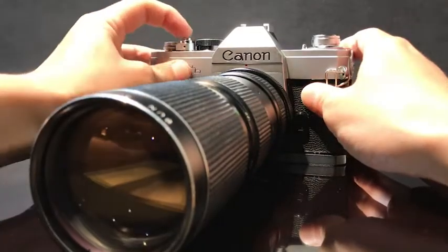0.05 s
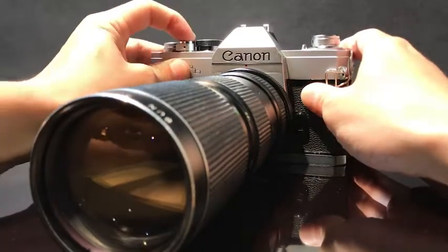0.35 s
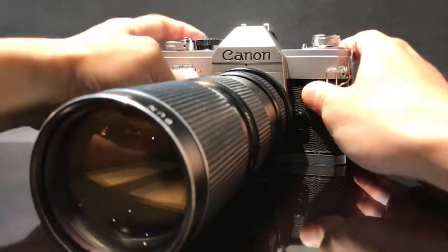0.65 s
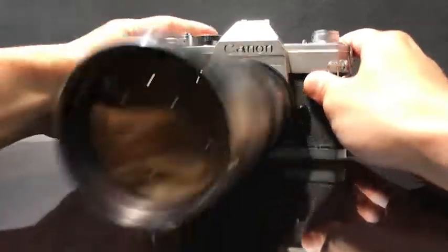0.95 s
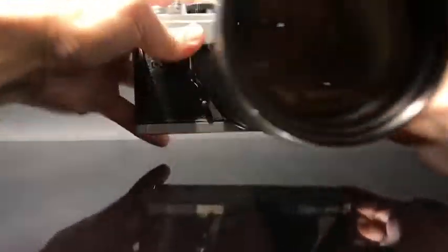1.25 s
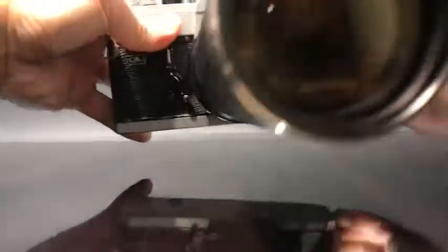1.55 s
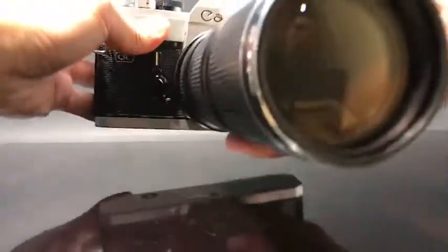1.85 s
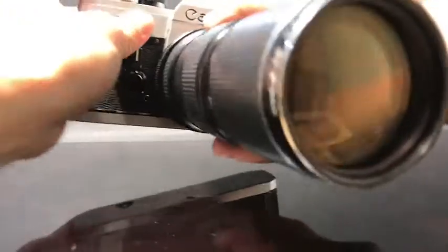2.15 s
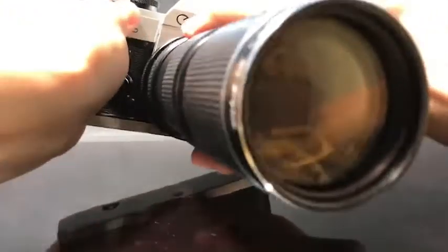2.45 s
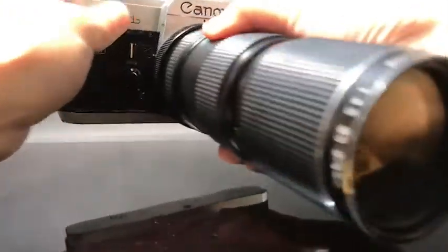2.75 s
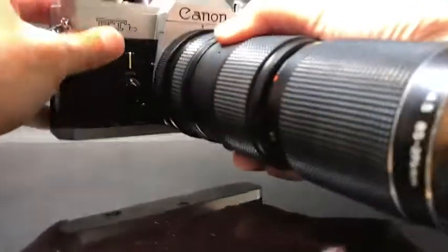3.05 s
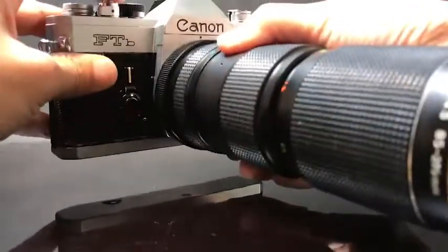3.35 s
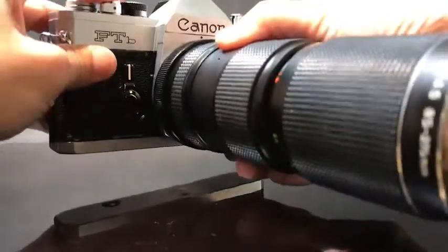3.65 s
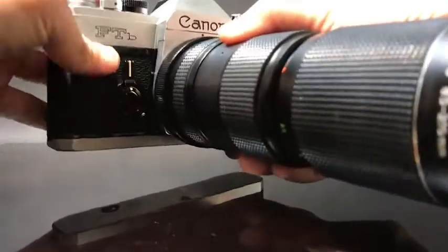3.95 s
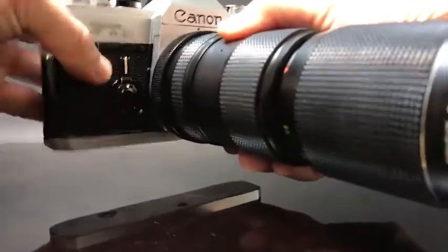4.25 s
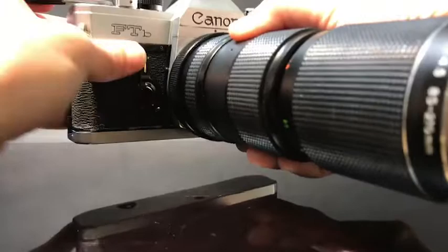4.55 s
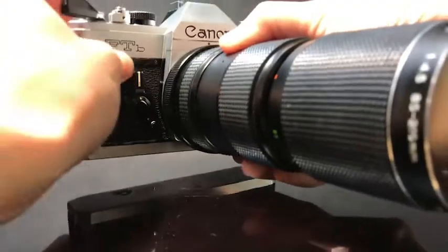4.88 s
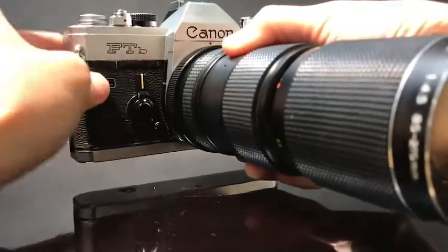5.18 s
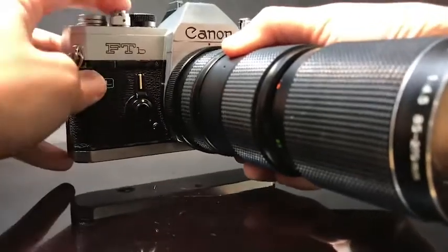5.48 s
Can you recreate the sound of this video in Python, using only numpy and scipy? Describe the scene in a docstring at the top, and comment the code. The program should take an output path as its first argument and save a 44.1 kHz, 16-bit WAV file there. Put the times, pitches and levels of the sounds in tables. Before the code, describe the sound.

Three crisp shutter clacks from a hand-wound film camera, separated by ticking gears, finger rubs and sharp lever snaps in a quiet room.

```python
"""A small quiet room, close on a mechanical film camera that is fired three times.
Each release plays the same cycle: the mirror flips up, the cloth curtains run and slam home, the mirror
drops. The first shot is on the desk, the others in the hands. Between shots the thumb winds on: skin
rubs, gears whirr, pawls tick, and the advance lever snaps back against its stop.
Hits are noise bursts plus ringing modes; rubs and whirrs are noise broken into tiny slips."""
import sys
import numpy as np
from scipy import signal
from scipy.fft import rfft, irfft, next_fast_len
from scipy.io import wavfile

SR = 44100
rng = np.random.default_rng(int(sys.argv[2]) if len(sys.argv) > 2 else 0)


def wav_record(signal):
    """Record a signal, one row per channel, as 16-bit PCM in the file named by sys.argv[1]."""
    frames = np.transpose(np.atleast_2d(signal))
    bounded = np.clip(frames, -1, 1)
    # unit amplitude maps onto the largest positive 16-bit level
    quanta = np.round(bounded * 32767).astype(np.int16)
    wavfile.write(sys.argv[1], SR, quanta)


N = 252252
TIME = np.arange(N) / SR
AGE = np.arange(SR // 8) / SR  # seconds since a hit
TOP_HZ = 15750


def amp(db):
    """Decibels to gain."""
    return 10 ** (np.asarray(db) / 20)


def unit(x):
    """Scale to rms 1."""
    return x / np.sqrt(np.mean(x ** 2) + 1e-20)


def along(points, hz):
    """Read a curve of (freq_hz, value) points on a log frequency axis."""
    freqs, values = np.transpose(points)
    return np.interp(np.log(hz + 1), np.log(freqs), values)


def fade(t, t60):
    """Exponential decay, 60 dB down at t60."""
    return np.exp(-np.log(1000) * t / np.maximum(t60, 1e-4))


def add(track, start_s, sound):
    """Mix a sound into a track."""
    part = track[round(start_s * SR):][:len(sound)]
    part += sound[:len(part)]


def coloured(x, eq, tilt_db=0):
    """Minimum-phase EQ of unit power gain, tilted by tilt_db per octave."""
    hz = np.fft.rfftfreq(4096, 1 / SR)
    gain = unit(amp(along(eq, hz) + tilt_db * np.log2(np.clip(hz, 400, TOP_HZ))))
    cepstrum = irfft(np.log(gain + 1e-9))
    cepstrum[1:len(hz) - 1] *= 2
    cepstrum[len(hz):] = 0
    impulse = irfft(np.exp(rfft(cepstrum)))
    return signal.oaconvolve(x, impulse)[:len(x)]


def crack(t60, rise_s):
    """The dense, fast-dying chatter of small metal parts after a contact."""
    return rng.standard_normal(len(AGE)) * fade(AGE, t60) * (1 - np.exp(-AGE / rise_s))


def ping(hz, t60):
    """A single damped mode."""
    return np.sin(2 * np.pi * hz * AGE) * fade(AGE, t60)


def ring(modes, scatter_db, detune):
    """Damped modes; level and pitch vary with each hit, and rattling parts blur their phase."""
    hz, db, t60 = np.transpose(modes)[:, :, None]
    size, shift, phase = rng.standard_normal((3, len(modes), 1))
    width_hz = .03 * hz
    blur = np.cumsum(rng.standard_normal((len(modes), len(AGE))), 1) * np.sqrt(2 * np.pi * width_hz / SR)
    waves = np.sin(2 * np.pi * (hz * (1 + detune * shift) * AGE + phase) + blur)
    attack = 1 - np.exp(-AGE / .00044)
    return np.sum(amp(db + scatter_db * size) * fade(AGE, t60) * waves, 0) * attack


def friction(eq, slips_per_s, spread_db):
    """A grainy bed of tiny uneven slips, at rms 1."""
    knots = rng.standard_normal(int(N / SR * slips_per_s) + 2)
    slips = amp(spread_db * np.interp(TIME * slips_per_s, np.arange(len(knots)), np.minimum(knots, 2)))
    return unit(coloured(slips * rng.standard_normal(N), eq))


def run_up(start_s, stop_s, db, growth_db):
    """Envelope of a spring-driven part that gains speed until it is stopped."""
    to_go = np.clip((stop_s - TIME) / (stop_s - start_s), 0, 1)
    return ((TIME > start_s) & (TIME < stop_s)) * amp(db - growth_db * to_go)


def stroke(start_s, length_s, rise_s, db, sag_db=5):
    """Envelope of one hand movement: it builds, eases off and is let go."""
    t = np.maximum(TIME - start_s, 0)
    eased_db = db - sag_db * np.minimum(t / length_s, 1)
    release = fade(np.maximum(t - length_s, 0), t60=.24)
    return np.minimum(t / rise_s, 1) * amp(eased_db) * release


# EQ of the room's air: freq_hz, gain_db
AIR_EQ = [(20, -11), (55, 0.5), (85, -14.5), (120, -10.5), (170, -14), (260, -10), (400, -16.5), (600, -20),
          (1000, -20), (2000, -26.5), (4000, -32), (8000, -40), (11000, -41), (15500, -41.5)]
# appliance hum: pitch_hz, level_db
HUM_TONES = [(54, -69.5), (121, -70)]


def room_tone():
    """A soft steady hiss over a faint appliance hum."""
    hum = sum(amp(db) * unit(np.sin(2 * np.pi * (hz * TIME + rng.random()))) for hz, db in HUM_TONES)
    return amp(-57.5) * unit(coloured(rng.standard_normal(N), AIR_EQ)) + hum


# resonances of the camera body, on the desk and held: pitch_hz, desk_db, held_db, t60_s
BODY_MODES = [(388, -26.5, -42.5, 0.052), (632, -30, -27, 0.16), (696, -27.5, -27.5, .07),
              (854, -28, -26.5, 0.058), (1234, -18, -29, 0.055), (1260, -18, -30, .05),
              (1676, -28, -21, 0.053), (1836, -29.5, -22.5, 0.059), (2015, -26, -21.5, 0.058),
              (2370, -30.5, -20.5, 0.05), (2830, -24, -23, .04), (3060, -19.5, -30.5, 0.034),
              (3490, -25, -27, 0.12), (4100, -26.5, -23, 0.078), (5970, -21.5, -20.5, 0.069),
              (6350, -19.5, -30, 0.032), (7140, -22, -25.5, 0.05), (8640, -19.5, -28.5, 0.062)]
DESK_MODES = [(hz, db, t60) for hz, db, _, t60 in BODY_MODES]
HELD_MODES = [(hz, db, t60) for hz, _, db, t60 in BODY_MODES]
# bright EQ of a small metal contact: freq_hz, gain_db
TICK_EQ = [(150, -20), (450, -15.5), (680, -8.5), (1500, -4.5), (2300, -5.5), (4200, -4), (6300, 3),
           (7800, -3), (9200, 2.5), (11000, -1), (13000, 3.5), (15500, -3.5)]
# tick cues, low end relative to level: start_s, level_db, low_end_db
TICK_CUES = [(0.081, -38, -18), (.0972, -36.5, -27), (0.4928, -33.5, -1.5), (.854, -49.5, 12),
             (1.1144, -42.5, 1), (1.147, -46.5, 9), (1.4384, -42, -16.5), (1.5, -25, -25),
             (1.5499, -29.5, 4), (1.5638, -30, -14), (1.5998, -22, -21.5), (1.9816, -37, 7.5),
             (2.0153, -36.5, -1), (2.0605, -23, -39), (2.0644, -14, -41), (2.0774, -18, -34),
             (2.1392, -19.5, -28), (2.1585, -32, -1), (2.1654, -33.5, -1), (2.24, -35.5, 1),
             (2.2637, -21, -27), (2.4894, -35, -1), (2.5064, -36, -10), (2.831, -28, -18.5),
             (3.751, -32, -8.5), (4.1648, -23.5, -19), (4.2123, -25, -13.5), (4.2399, -25, -1.5),
             (4.261, -31, -21), (4.3124, -26, -22), (4.3216, -34.5, 0), (4.377, -44.5, 9),
             (4.5948, -10.5, -42), (4.6064, -18.5, -38), (4.6633, -23, -16.5), (4.6805, -30, -9),
             (4.6868, -28.5, -10), (4.784, -21.5, -28), (5.0883, -33.5, -6), (5.1044, -35, -3),
             (5.384, -31, -11), (5.6313, -36, -24)]


def ticks():
    """Pawls, gear teeth and strap fittings click; the duller hits stir more of the body."""
    out = np.zeros(N)
    for start_s, db, low_end_db in TICK_CUES:
        dull_db = low_end_db + 17.5
        tilt_db = -.2 * max(dull_db, -7)  # steel on steel gets no brighter than this
        tick = coloured(crack(t60=.017, rise_s=.0005), TICK_EQ, tilt_db)
        body = amp(-2 + .46 * dull_db) * ring(HELD_MODES, scatter_db=3, detune=.05)
        add(out, start_s, amp(db - 4) * (tick + body))
    return out


# EQ of the shutter's clack: freq_hz, desk_db, held_db
CLACK_EQ = [(80, -15, -22.5), (299.4, -16.5, -25.5), (629, -10.5, 4.5), (1250, 0, -4.5), (2010, -3.5, 1),
            (4160, 1, 2), (4700, -6, -3), (6000, 1, 0.5), (8050, -3.5, -4.5), (9900, -2.5, -5),
            (11500, -5.5, -4.5), (13000, -6, -1.5), (15700, -11, -7)]
DESK_EQ = [(hz, db) for hz, db, _ in CLACK_EQ]
HELD_EQ = [(hz, db) for hz, _, db in CLACK_EQ]
# The hits of one shot: the mirror lets go, hits its top stop and bounces twice; two curtains land,
# the second rebounds; the mirror drops and settles in two bounces.
# delay_s, desk_db, held_db, t60_s, tilt_db_per_octave, body_db, spring_db
SHUTTER_HITS = [(0, -10.5, -15, .021, 0.65, 2.5, -13.5), (.0081, -11, -9, .007, -0.5, -0.5, 1),
                (0.0205, -16.5, -17.5, .013, 1.5, -2.5, -1), (.03, -22, -22, .011, -7, 5, -16),
                (.0527, -8, -9, .038, 1, 1.5, -18.5), (.0578, -6.5, -6.5, .019, 1, 2.5, -14.5),
                (0.067, -20, -17, .017, 1, -0.5, -13), (.0912, -24, -18.5, .013, 2, 4, -13.5),
                (0.1235, -32.5, -32, .021, 0, -2, -18), (0.1442, -38.5, -40.5, .017, -8, 8, -15)]
# shutter cues: start_s, tilt_db_per_octave, body_db
SHOT_CUES = [(.1580, -0.24, 0), (3.4850, 0.5, 0.5), (5.6957, 0.5, 2.5)]


def shutter(lift_s=.9):
    """Mirror and curtains strike the body and ping a spring; after lift_s the grip changes the tone."""
    out = np.zeros(N)
    curtains = friction(DESK_EQ, slips_per_s=700, spread_db=5)
    for start_s, shot_tilt_db, shot_body_db in SHOT_CUES:
        held = start_s > lift_s
        eq, modes, curtain_db = (HELD_EQ, HELD_MODES, -29) if held else (DESK_EQ, DESK_MODES, -27.5)
        out += run_up(start_s + .012, start_s + .054, curtain_db, growth_db=4.5) * curtains
        for delay_s, desk_db, held_db, t60, tilt_db, body_db, spring_db in SHUTTER_HITS:
            # a long hit is a pile-up of contacts, so its attack is slower too
            hit = amp(4.5) * coloured(crack(t60, rise_s=.052 * t60), eq, tilt_db + shot_tilt_db)
            hit += amp(body_db + shot_body_db) * ring(modes, scatter_db=1.5, detune=.018)
            hit += amp(spring_db) * ping(hz=9770, t60=.0068)
            add(out, start_s + delay_s, amp(held_db if held else desk_db) * hit)
    return out


# EQs of midrange skin rub and airy gear whirr: freq_hz, gain_db
RUB_EQ = [(150, -12.5), (500, -12), (660, 6.5), (900, -6), (1200, 3), (1500, -9), (2200, -5), (3300, -10),
          (4600, -11), (8000, -14.5), (15000, -32)]
WHIRR_EQ = [(1500, -21), (4000, -6.5), (6000, -2), (9000, -2.5), (11000, -2.5), (13000, 3), (15500, -6.5)]
# finger moves: start_s, length_s, rise_s, rub_db, whirr_db
WINDING_CUES = [(0.545, 0.2, 0.037, -66, -68), (0.979, 0.066, 0.03, -59, -80),
                (1.468, 0.15, 0.032, -52, -65), (1.706, 0.17, 0.027, -51.5, -61),
                (2.068, 0.26, .03, -57.5, -56.5), (2.478, 0.036, .02, -54.5, -74),
                (4.162, 0.12, .05, -48.5, -62), (4.414, .12, 0.0033, -46.5, -55),
                (4.574, 0.24, 0.081, -53, -57), (4.886, 0.037, .012, -74, -58),
                (5.077, 0.085, .02, -51.5, -72)]


def winding():
    """A finger slides over the casing while the film gears turn in tiny catches."""
    sliding = sum(stroke(*timing, db) for *timing, db, _ in WINDING_CUES)
    turning = sum(stroke(*timing, db) for *timing, _, db in WINDING_CUES)
    rub = sliding * friction(RUB_EQ, slips_per_s=700, spread_db=4)
    whirr = turning * friction(WHIRR_EQ, slips_per_s=450, spread_db=5)
    return rub + whirr


# fingertip knocks: start_s, level_db, pitch_hz
TAP_CUES = [(.617, -45, 867), (1.548, -44, 712), (4.241, -38, 664)]


def finger_taps():
    """Each fingertip lands on the casing with one short, soft note."""
    out = np.zeros(N)
    for start_s, db, hz in TAP_CUES:
        add(out, start_s, amp(db) * ping(hz, t60=.042))
    return out


# muffled EQ of the palm: freq_hz, gain_db
PALM_EQ = [(80, -14), (160, -13), (220, -0.5), (300, -5.5), (450, -20), (1000, -30)]
# palm moves: start_s, length_s, rise_s, level_db
PALM_CUES = [(1.44, 0.28, 0.085, -61), (2.449, 0.22, 0.082, -67), (4.89, .16, 0.044, -59)]


def palm_rub():
    """The palm shifts against the body with a soft low rub."""
    return sum(stroke(*cue) for cue in PALM_CUES) * friction(PALM_EQ, slips_per_s=38, spread_db=4.5)


# narrow, edgy EQ of skin on ribs: freq_hz, gain_db
RASP_EQ = [(1500, -32), (2600, -13), (3100, 0), (3600, -5), (4300, -13), (8000, -36)]
# finger slides: start_s, length_s, rise_s, level_db
RASP_CUES = [(1.716, 0.14, 0.055, -51.5), (4.412, 0.16, .004, -58)]


def grip_rasp():
    """A finger rasps along the ribbed lens grip or the knurled lever."""
    return sum(stroke(*cue) for cue in RASP_CUES) * friction(RASP_EQ, slips_per_s=330, spread_db=5)


# lever resonances, damped differently by the thumb each time: pitch_hz, first_db, second_db, t60_s
LEVER_MODES = [(674, -23, -22, 0.12), (1232, -13, -15.5, 0.038), (1846, -10, -11, 0.022),
               (2856, -23, -16, 0.046), (5213, -12, -16, 0.028), (6064, -2.5, -4.5, 0.018),
               (8700, -7, -25, 0.058), (11660, 0, -26.5, 0.018), (12700, -19, 3.5, 0.021),
               (13310, 1, -16, 0.02), (15800, -14, -1.5, 0.013)]
# crisp EQ of the snap: freq_hz, gain_db
SNAP_EQ = [(80, -20.5), (250, -8), (480, -12), (1200, -8), (2000, -8), (3300, -3.5), (6000, -6.5),
           (7500, -7), (8600, -7.5), (10100, -3), (11300, -3.5), (13200, 5), (15500, -2.5)]
# the lever meets its stop: start_s, level_db, t60_s, steel_db, thud_db
SNAP_CUES = [(2.649, -15, 0.023, 0, -14.5), (5.1587, -13.5, 0.021, 2, -13.5)]


def advance_lever(swing_s=.019):
    """The lever scrapes home on its spring, rings on its stop and jolts the whole camera."""
    swings = sum(run_up(snap_s - swing_s, snap_s, db=-29, growth_db=20.5) for snap_s, *_ in SNAP_CUES)
    out = swings * friction(TICK_EQ, slips_per_s=900, spread_db=4)
    hz, *levels_per_snap, mode_t60 = np.transpose(LEVER_MODES)
    for (start_s, db, t60, steel_db, thud_db), mode_db in zip(SNAP_CUES, levels_per_snap):
        hit = amp(3) * coloured(crack(t60, rise_s=.00022), SNAP_EQ)
        hit += amp(steel_db) * ring(np.c_[hz, mode_db, mode_t60], scatter_db=1, detune=.008)
        hit += amp(thud_db) * ping(hz=185, t60=.017)
        add(out, start_s, amp(db) * hit)
    return out


# reverb time of the room: freq_hz, t60_s
ROOM_DECAY = [(150, .25), (700, 0.51), (3000, 0.36), (8000, 0.39), (15000, 0.29)]


def reverb(x):
    """Nearby surfaces answer in a short cluster, then the walls ring out."""
    hz, t, bands = signal.stft(rng.standard_normal(SR // 2), SR, nperseg=256)
    tail = signal.istft(bands * fade(t, along(ROOM_DECAY, hz)[:, None]), SR, nperseg=256)[1]
    tail *= 1 - np.exp(-np.arange(len(tail)) / SR / .012)
    early = crack(t60=.055, rise_s=.0011)
    impulse = np.zeros(SR // 2)
    add(impulse, .009, amp(-12) * early / np.linalg.norm(early))
    add(impulse, .012, amp(-21) * tail / np.linalg.norm(tail))
    return signal.fftconvolve(x, impulse)[:N]


def scene():
    """Three mono stems over room tone, each with its own reverb send: shutter driest, lever wettest."""
    handling = ticks() + winding() + finger_taps() + palm_rub() + grip_rasp()
    stems = [(shutter(), -3), (handling, -2), (advance_lever(), 1)]
    camera = sum(stem + amp(send_db) * reverb(stem) for stem, send_db in stems)
    return (camera + room_tone())[None]


def record(dry):
    """Hard clip at full scale, then a steep low-pass at TOP_HZ."""
    padded = next_fast_len(N + SR // 2)
    hz = np.fft.rfftfreq(padded, 1 / SR)
    spectrum = rfft(np.clip(dry, -1, 1), padded)
    return irfft(spectrum / (1 + (hz / TOP_HZ) ** 120), padded)[:, :N]


dry = scene()
out = record(dry)
wav_record(out)
```